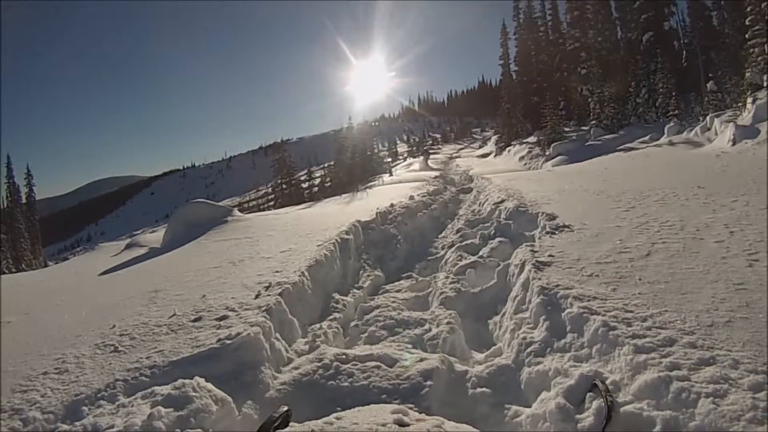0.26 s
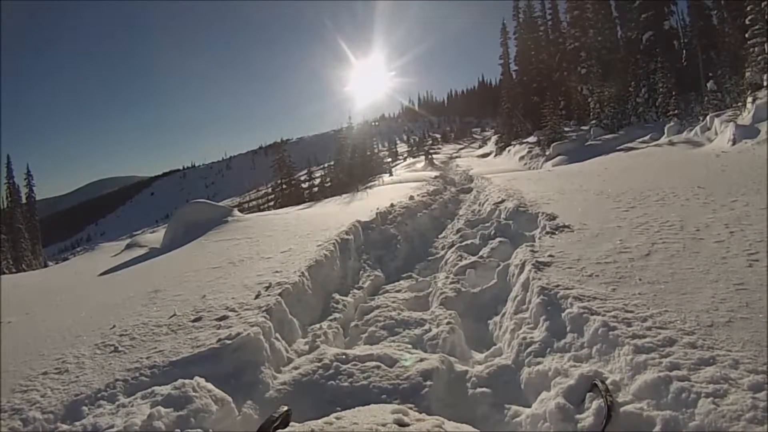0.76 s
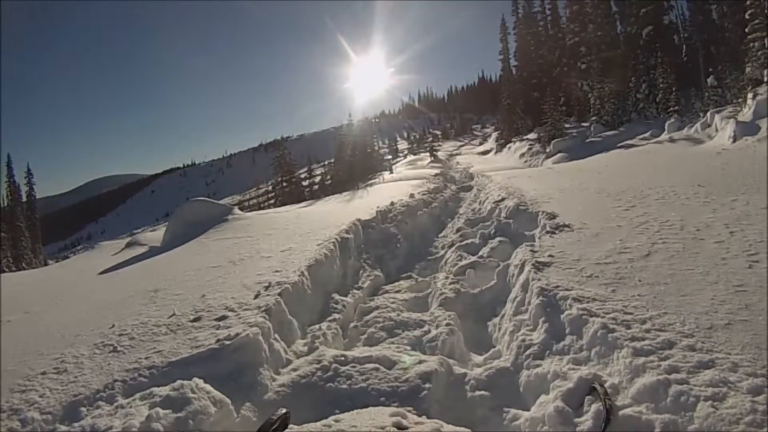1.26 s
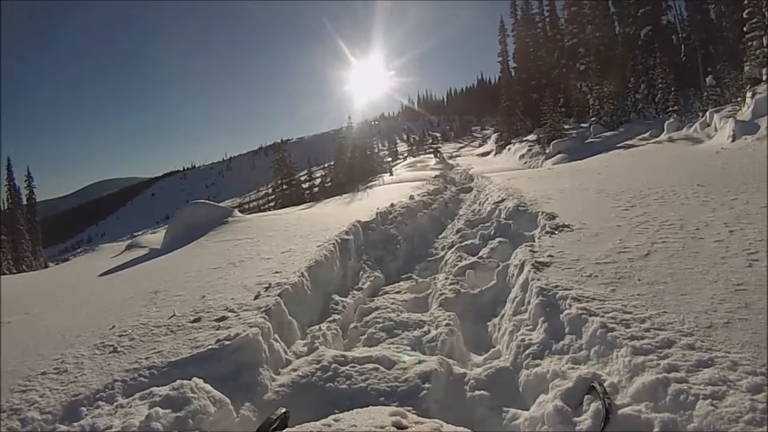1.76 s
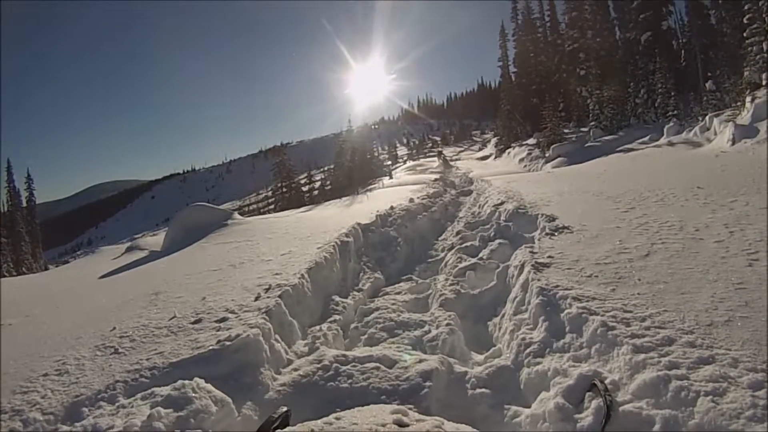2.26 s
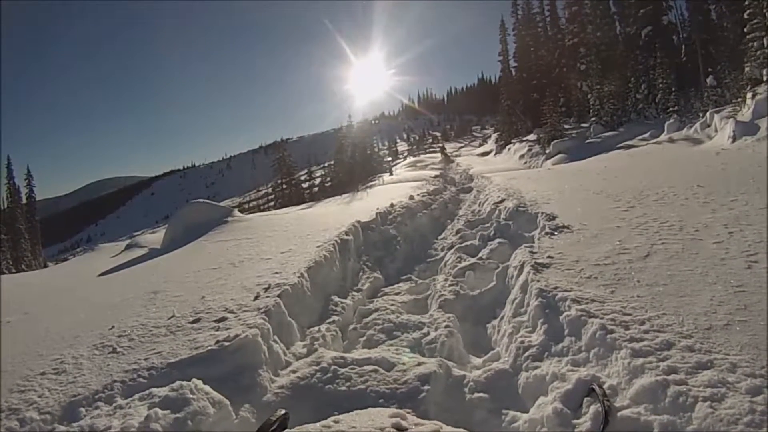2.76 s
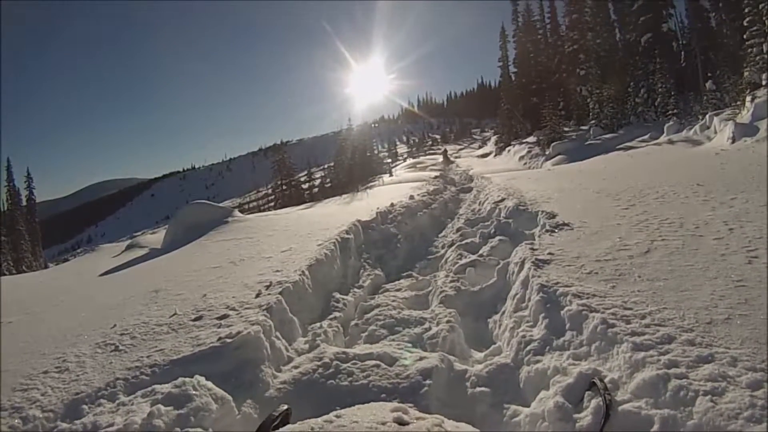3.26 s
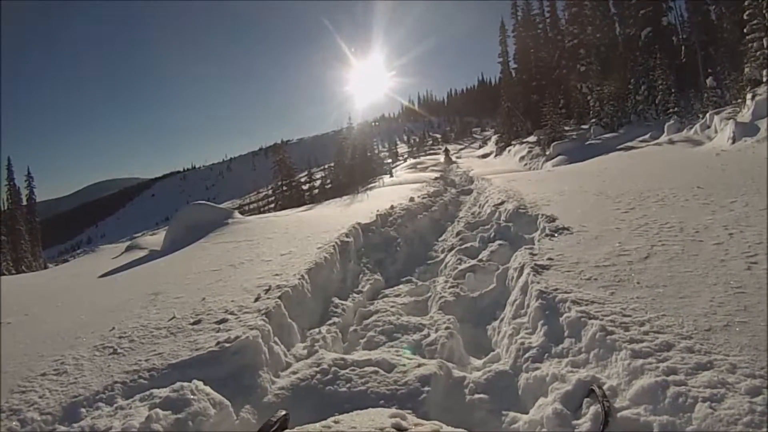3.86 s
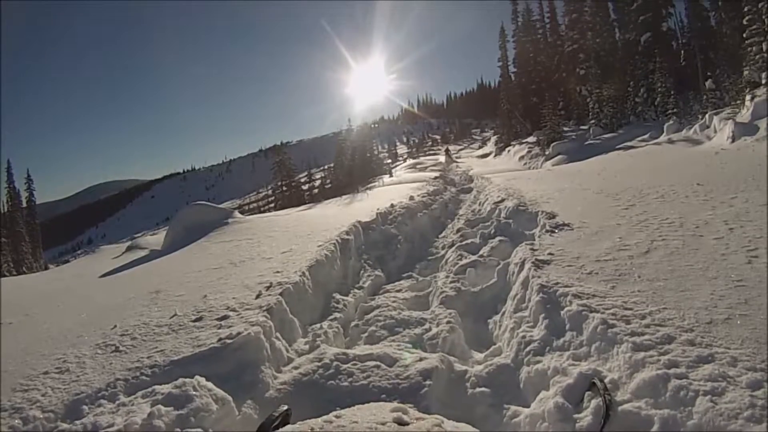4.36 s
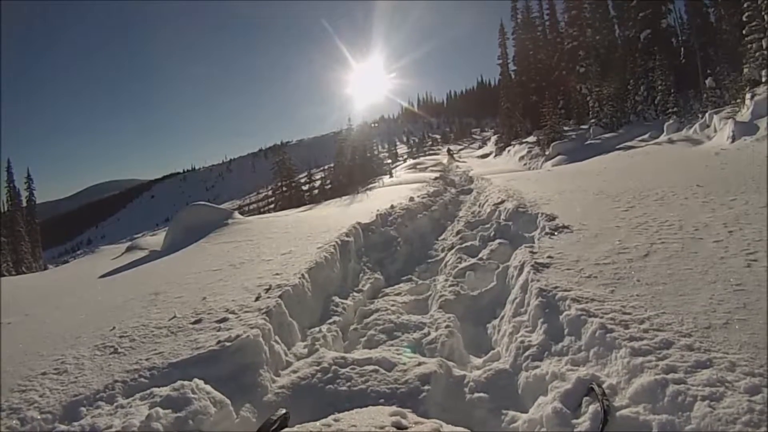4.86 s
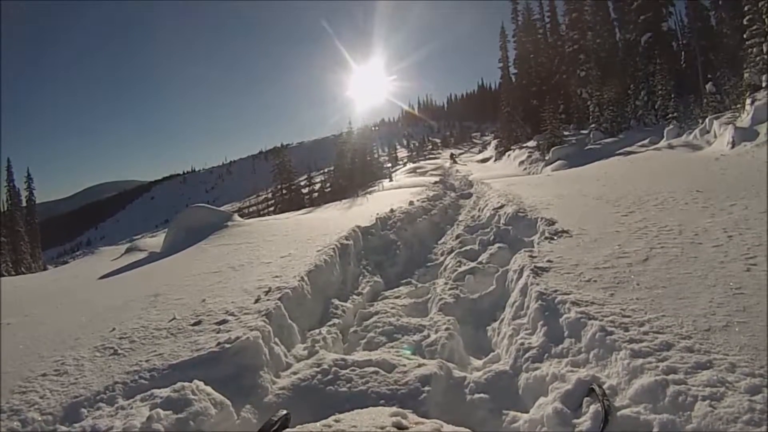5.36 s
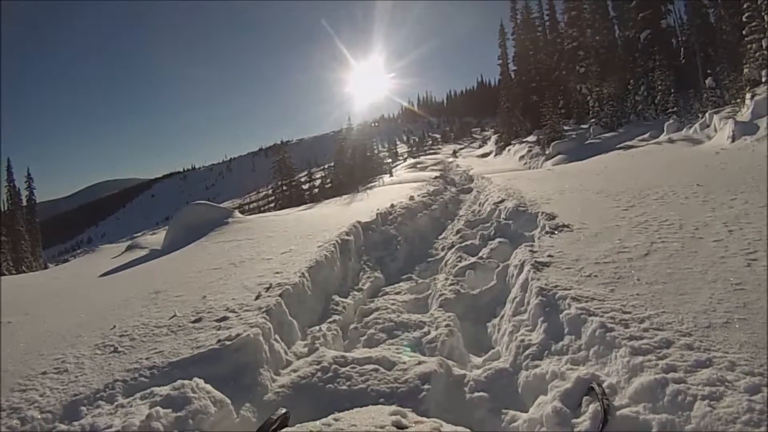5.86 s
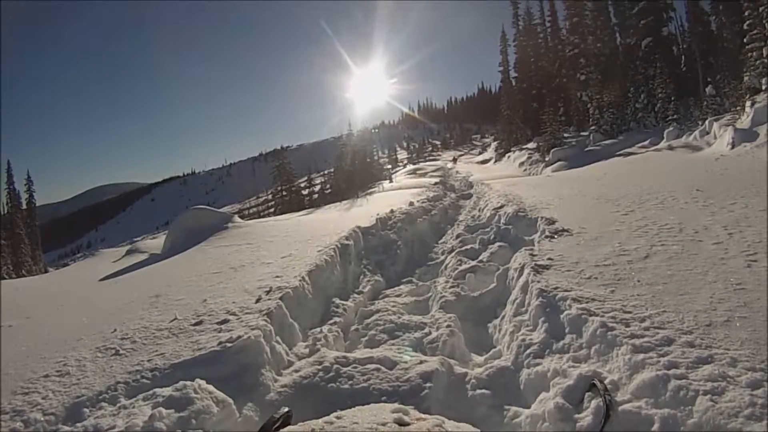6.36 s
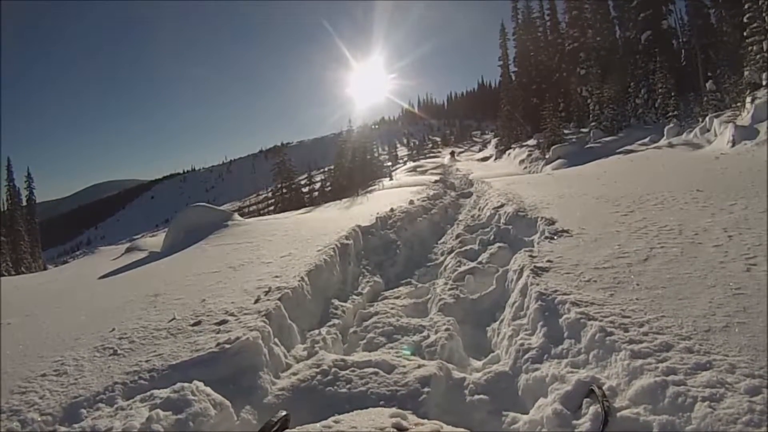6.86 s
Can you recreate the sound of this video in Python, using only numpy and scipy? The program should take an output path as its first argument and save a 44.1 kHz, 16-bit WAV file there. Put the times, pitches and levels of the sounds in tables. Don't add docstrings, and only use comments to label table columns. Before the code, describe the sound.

A snowmobile's two-stroke engine idles throughout, picked up by a sealed camera clamped to its body. A very deep, near-pure throb dominates, sagging briefly at each misfire. Quieter exhaust puffs, intake breath and casing rattle sit above it. Loose fittings snap and thud, mostly in the first second; a harder metallic knock comes from about 1.3 to 2.3 seconds, then the idle carries on. Open snow, no echo, dulled treble.

```python
import sys
import numpy as np
from scipy import signal
from scipy.io import wavfile
from scipy.ndimage import uniform_filter1d

SR = 44100
rng = np.random.default_rng(int(sys.argv[2]) if len(sys.argv) > 2 else 0)


def amplitude_ratio(level_db):
    exponent = np.asarray(level_db, float) / 20
    return 10 ** exponent


def put_to_file(sound):
    columns = np.atleast_2d(sound).T
    safe = np.clip(columns, -1, 1)
    whole_steps = np.round(safe * 32767)
    wavfile.write(sys.argv[1], SR, whole_steps.astype(np.int16))


N = 313110
COARSE = np.arange(0, N, 64)


def unit(x):
    return x / np.sqrt(np.mean(x ** 2))


def curves(table):
    s, *columns = np.transpose(table)
    return [np.interp(np.arange(N) / SR, s, column) for column in columns]


def refine(coarse_values):
    return np.interp(np.arange(N), COARSE, coarse_values)


def ring(x, hz, width_hz):
    return signal.lfilter(*signal.iirpeak(hz, hz / width_hz, fs=SR), x)


def body(x, modes):
    out = np.zeros(N)
    for k, (hz, width_hz, level_db) in enumerate(modes):
        out += (-1) ** k * amplitude_ratio(level_db) * ring(x, hz, width_hz)
    return out


def walk(rate):
    hold = int(SR / rate)
    steps = np.repeat(rng.standard_normal(N // hold + 1), hold)
    return 1.36 * uniform_filter1d(uniform_filter1d(steps, hold), hold)[:N]


def blows(turns, place, scatter, scatter_db):
    chance = np.clip(rng.standard_normal((260, 3)), -2, 2)
    at = np.searchsorted(turns, np.arange(len(chance)) + place + scatter * chance[:, 0])
    force = np.sign(chance[:, 2]) * amplitude_ratio(scatter_db * chance[:, 1])
    out = np.zeros(N + 1)
    np.add.at(out, at, force * (at > 0))
    return out[:N]


def struck(events, delay_s):
    s, peak_db = np.transpose(events)
    out = np.zeros(N)
    out[((s + delay_s) * SR).astype(int)] = amplitude_ratio(peak_db)
    return out


def smear(x, tail_s):
    reach_s = np.arange(-1000, 1001) / SR
    envelope = signal.oaconvolve(np.abs(x), np.exp(-np.abs(reach_s) / tail_s), "same")
    return envelope * rng.standard_normal(N)


# start_s [s], turns_hz [Hz], shake_db [dB]
IDLE_SPEED = [(0.0, 28.45, -8.2), (0.28, 30.7, -5.8), (1.01, 30.48, -6.6), (1.42, 27.88, -11.3),
              (1.82, 30.68, -6.4), (2.09, 29.63, -5.9), (2.34, 30.12, -5.4), (2.87, 29.75, -7.4),
              (3.22, 29.4, -6.5), (3.68, 30.15, -7.1), (4.11, 29.94, -6.2), (4.76, 29.01, -10.3),
              (4.95, 28.59, -7.4), (5.57, 30.29, -4.9), (5.77, 30.05, -6.0), (6.43, 29.66, -7.5),
              (6.59, 30.2, -6.0), (7.1, 29.82, -7.5)]
# start_s [s], sag_db [dB of shake], slow_hz [Hz of crank speed]
SINGLE_MISFIRES = [(0.121, 1.0, 1.48), (0.251, 3.0, 4.34), (0.393, 3.2, 3.86), (0.53, 2.4, 2.64),
                   (1.429, 3.1, 1.47), (1.55, 1.9, 1.29), (1.69, 3.8, 3.46), (1.764, 1.6, 1.51),
                   (1.848, 12.3, 7.86), (1.995, 5.5, 4.94), (2.138, 5.2, 3.74), (2.262, 4.5, 3.59),
                   (2.402, 4.0, 3.08), (2.582, 1.3, 1.43), (3.363, 2.2, 1.28), (3.534, 1.5, 1.82),
                   (3.637, 5.9, 4.11), (3.764, 3.7, 2.89), (3.914, 2.8, 2.3), (4.035, 3.5, 2.3),
                   (4.229, 2.8, 2.0), (4.409, 2.6, 2.22), (4.569, 0.6, 1.65), (4.718, 5.5, 3.09),
                   (5.001, 3.5, 1.62), (5.163, 1.8, 1.41), (5.32, 3.3, 3.45), (5.47, 5.3, 3.8),
                   (5.604, 4.1, 2.73), (7.0, 2.5, 2.49)]
# first_s [s], spacing_s [s], count, sag_db [dB], slow_hz [Hz]
MISFIRE_RUNS = [
    (0.691, 0.177, 4, 1.6, 0.72),
    (2.784, 0.144, 3, 2.5, 1.78),
    (5.73, 0.135, 5, 2.5, 1.51),
    (6.393, 0.153, 4, 2.6, 2.32),
]


def crank():
    hz, shake_db = curves(IDLE_SPEED)
    misfires = list(SINGLE_MISFIRES)
    for first_s, spacing_s, count, *size in MISFIRE_RUNS:
        misfires += [(first_s + k * spacing_s, *size) for k in range(count)]
    s, sag_db, slow_hz = np.transpose(misfires)
    since_s = COARSE[:, None] / SR - s
    sag_s, recover_s, slow_s = .03, .024, .02
    sag_db = np.exp(-.5 * (since_s / np.where(since_s < 0, sag_s, recover_s)) ** 2) @ sag_db
    slow_hz = np.exp(-.5 * (since_s / slow_s) ** 2) @ slow_hz
    start_turn = .388
    turns = start_turn + np.cumsum(hz - refine(slow_hz)) / SR
    trend = np.linspace(turns[0], turns[-1], N)
    flywheel = trend + uniform_filter1d(turns - trend, size=SR // 4, mode="nearest")
    return turns, shake_db - refine(sag_db), flywheel


# start_s [s], strain_db [dB about the mean]
MOUNT_STRAIN = [(0, 2.5), (.5, -1.5), (1.0, -2), (1.2, -1), (1.42, 2), (2.2, 6), (2.38, 1), (2.65, -0.5),
                (2.9, -1), (3.3, -1.5), (3.8, 0), (4.0, 0.5), (4.25, -2), (4.7, 1), (5.3, 5), (5.65, -0.5),
                (6.1, -1), (7.1, -0.5)]


def controls(shake_db):
    mean_swing_db, swing_s, middle_s = -8, .25, 3.5
    swing_db = uniform_filter1d(shake_db, size=int(swing_s * SR)) - mean_swing_db
    return np.array([np.ones(N), *curves(MOUNT_STRAIN), swing_db, np.arange(N) / SR - middle_s])


# multiple, from_s [s], to_s [s], lift_db [dB]; a negative lift or from_s
# after to_s makes a dip, both together a swell
ORDER_SPELLS = [(2, -2, 0.8, 3), (2, 0.4, 2.16, 4.5), (2, 1.5, 3.1, 2.5), (2, 3.5, 4.7, 5.5),
                (2, 3.5, 6.3, -6), (3, .5, 0.89, 10.5), (3, 1.6, 2.7, 5), (3, 3.5, 3.1, 6),
                (3, 3, 4.1, 4.5), (3, 5, 4.95, 6), (3, 5, 7.2, 12), (4, -0.3, 1.1, 3.5), (4, 1.6, 1.59, 3),
                (4, 2.36, 2.3, 9), (4, 2.3, 2.68, 4.5), (4, 2.5, 3.48, 11), (4, 4, 5.5, 5.5),
                (5, 1, 1.36, 8.5), (5, 2, 3.6, -0.5), (5, 4.5, 4.1, 5.5), (6, 0.1, 1.3, -4),
                (6, 0.8, 1.9, 3), (6, 3.5, 3.34, -5), (6, 5.5, 7.2, 4), (7, -0.4, 1.1, 5), (7, 1.1, 1.7, 1),
                (8, 0.2, .3, 8.5), (8, -1.5, .7, 4), (8, 1.1, 1.13, 11.5), (8, 1.75, 1.9, 12.5),
                (8, 1.8, 2.34, 9), (8, 3, 2.8, 4), (8, 3.05, 3.41, 10.5), (8, 3.5, 3.88, 15.5),
                (8, 4, 4.3, 10.5), (8, 5, 5.5, 11.5), (8, 6, 6.8, 5), (9, 5, 5.7, 10.5), (9, 6, 7.9, 5),
                (10, 0.2, 1.9, 9), (10, 2, 2.3, 14.5), (10, 3.7, 4.0, 5.5), (10, 4, 4.7, 9),
                (10, 6, 6.2, 4), (11, 0.8, 1.9, 12.5), (11, 2.1, 2.35, 13), (11, 4.5, 5.1, 13)]


def spell_db(multiple):
    t, edge_s = np.arange(N) / SR, 0.032
    lift = np.zeros(N)
    for k, from_s, to_s, lift_db in ORDER_SPELLS:
        if round(k) == multiple:
            lift += lift_db * (np.tanh((t - from_s) / edge_s) - np.tanh((t - to_s) / edge_s)) / 2
    return lift


# level_db [dB], per_strain [dB/dB], per_swing [dB/dB], settling [dB/s]
SECOND_ORDER = (-34, 1.12, 0.05, 0.56)
# lean [rad], per_strain [rad/dB], per_swing [rad/dB], settling [rad/s]
CREST_LEAN = (0.23, -0.13, 0.39, 0.088)
# multiple, level_db [dB], per_strain [dB/dB], per_swing [dB/dB], settling [dB/s]
STRONG_ORDERS = [(3, -46.5, 0.01, 0.34, -0.56), (4, -51.5, 0.05, .1, -2), (8, -50.5, 0.41, .01, -0.7)]
# multiple, level_db [dB]
WEAK_ORDERS = [(5, -49.5), (6, -49.5), (7, -49.5), (9, -56), (10, -57), (11, -58)]


def shake(turns, shake_db, flywheel, state):
    def order(multiple, level_db, phase):
        return amplitude_ratio(level_db) * np.cos(2 * np.pi * multiple * flywheel + phase)

    out = amplitude_ratio(shake_db) * np.cos(2 * np.pi * turns)
    out += order(2, SECOND_ORDER @ state + spell_db(2) + 1.8 * walk(25), CREST_LEAN @ state)
    for k, *law in STRONG_ORDERS:
        wander_db = spell_db(k) + .5 * walk(3) + 1.2 * walk(20)
        out += order(k, law @ state + wander_db, np.pi + .35 * walk(5))
    for k, level_db in WEAK_ORDERS:
        wander_db = spell_db(k) + .5 * walk(3) + 2.6 * walk(20)
        out += order(k, level_db + wander_db, np.pi + .9 * walk(9))
    return np.sqrt(2) * out


# centre_hz [Hz], width_hz [Hz], level_db [dB]
SILENCER_MODES = [(110, 56, 0.5), (162.2, 59.4, -5.5), (191.6, 32, -10), (232, 54.4, -3.5),
                  (289.4, 73.6, -1.5), (389.3, 56.8, -6)]
# level_db [dB], per_strain [dB/dB], per_swing [dB/dB], settling [dB/s]
EXHAUST_LEVEL = (-35.5, 0.65, -0.2, 0)


def exhaust(flywheel, state):
    strong = np.abs(blows(flywheel, .9, .035, 3.5))
    weak = amplitude_ratio(-13.0) * np.abs(blows(flywheel, .4, 0.012, 3.1))
    turbulence = rng.standard_normal(N) * amplitude_ratio(0.72 * walk(12))
    drive = unit(strong + weak) * amplitude_ratio(-5.5) + turbulence
    return unit(body(drive, SILENCER_MODES)) * amplitude_ratio(EXHAUST_LEVEL @ state - 0.5)


# start_s [s], cover_db [dB of cover ring], crack_db [dB of crack]
PISTON_SLAPS = [(1.2596, -51, -41), (1.2947, -48, -44), (1.3323, -43, -39), (1.3673, -38, -38),
                (1.4021, -35, -34), (1.4378, -47, -35), (1.4741, -37, -33), (1.5091, -36, -36),
                (1.5453, -40, -31), (1.5814, -40, -34), (1.6164, -38, -34), (1.6522, -39, -33.5),
                (1.6886, -39, -35), (1.725, -34, -35), (1.7601, -34, -33), (1.7972, -35, -34),
                (1.8327, -36, -33.5), (1.8687, -36, -33.5), (1.9037, -35, -34), (1.94, -40, -37),
                (1.9752, -41, -34), (2.0106, -45.5, -32.5), (2.0446, -38, -43), (2.0806, -41, -39),
                (2.1158, -44, -29.5), (2.1522, -39, -33), (2.187, -40, -37), (2.2224, -40, -33.5),
                (2.2573, -43, -38), (2.2929, -44, -41), (2.326, -56, -44), (2.3636, -54, -46),
                (3.6279, -47, -40), (3.6629, -51, -40), (3.6977, -56, -41), (3.7299, -49, -41),
                (3.7664, -46, -43), (3.8008, -45, -39), (3.8337, -44, -41), (3.8673, -41, -41),
                (3.9024, -38, -37), (3.9371, -47, -37), (3.9727, -48, -45), (4.0081, -46, -45),
                (4.0435, -51, -43), (4.9475, -47, -39), (4.9829, -55, -44), (5.0533, -46, -43),
                (5.0882, -41, -48), (5.1586, -42, -41), (5.1934, -42, -42), (5.2281, -47, -41),
                (5.26, -47, -45), (5.2988, -45, -45), (5.3326, -48, -41), (5.3675, -50, -41),
                (5.4019, -45, -48), (5.437, -44, -42)]
# centre_hz [Hz], width_hz [Hz], level_db [dB]
CASING_MODES = [(1093, 78, -12), (1336, 84, -7), (1408.5, 34.6, 2.5), (1509, 73, -2), (1589, 102, -3),
                (1688, 132, -4.5), (2049, 155, -12), (2436, 180, -19)]
# level_db [dB], per_strain [dB/dB], per_swing [dB/dB], settling [dB/s]
KNOCK_LEVEL = (-57.3, 1.45, -.5, -.65)


def knock(state):
    level_db = KNOCK_LEVEL @ state
    slack_db, slack_span_db = -51.8, 1.1
    slack = 1 / (1.5 + np.exp((slack_db - level_db) / slack_span_db))
    churn = (1 - .92 * slack) * unit(ring(ring(rng.standard_normal(N), 820, 140), 820, 140))
    s, cover_db, crack_db = np.transpose(PISTON_SLAPS)
    cover_blow = struck(np.c_[s, cover_db], 0.00252)
    cover = amplitude_ratio(44.5) * ring(ring(cover_blow, 823, 96), 823, 96)
    slap = struck(np.c_[s, crack_db], 0.00117)
    slap = slap + .025 * smear(slap, .001)
    crack = amplitude_ratio(26) * ring(ring(ring(slap, 2050, 1200), 2050, 1200), 2050, 1200)
    bore = amplitude_ratio(33) * ring(ring(slap, 1970, 260), 1970, 260)
    casing = amplitude_ratio(24) * body(slap, CASING_MODES)
    return amplitude_ratio(level_db - 1.0) * churn + cover + crack + bore + casing


# level_db [dB], per_strain [dB/dB], per_swing [dB/dB], settling [dB/s]
RATTLE_LEVEL = (-43, 0.49, -0.05, -0.1)


def rattle(flywheel, state):
    bursts = sum(smear(blows(flywheel, place, 0.025, 2.8), .0015) for place in (.28, .66, .72))
    churn = rng.standard_normal(N) * amplitude_ratio(0.72 * walk(17))
    drive = amplitude_ratio(-3.0) * unit(bursts) + churn
    return unit(body(drive, CASING_MODES)) * amplitude_ratio(RATTLE_LEVEL @ state)


# centre_hz [Hz], width_hz [Hz], level_db [dB]
AIR_BOX_MODES = [(465, 98, -1.5), (559.5, 147, -3), (642, 93, -5.5)]
# level_db [dB], per_strain [dB/dB], per_swing [dB/dB], settling [dB/s]
INTAKE_LEVEL = (-47.5, 1.5, -0.5, 0.1)


def intake(flywheel, state):
    gulp = 1 + 0.53 * np.cos(2 * np.pi * (flywheel - .95))
    air = gulp * rng.standard_normal(N) * amplitude_ratio(0.52 * walk(15))
    return unit(body(air, AIR_BOX_MODES)) * amplitude_ratio(INTAKE_LEVEL @ state - 1.5)


# place [turns], scatter [turns], level_db [dB], scatter_db [dB]
SLACK_STRIKES = [(.79, .035, 0, 3), (.72, .04, -3, 3), (.27, .012, -2, 3), (.68, .05, -7, 3.5),
                 (.84, .04, -6, 3.5), (.36, .08, -8, 4), (.5, .15, -9, 4), (.6, .2, -10, 4)]


def slack_strikes(turns, shake_db):
    swing = amplitude_ratio(0.53 * (shake_db - uniform_filter1d(shake_db, size=SR // 4)))
    strikes = np.zeros(N)
    for place, scatter, level_db, scatter_db in SLACK_STRIKES:
        strikes += amplitude_ratio(level_db) * np.abs(blows(turns, place, scatter, scatter_db))
    return unit(smear(strikes * swing * amplitude_ratio(1.6 * walk(14) + 1.2 * walk(5)), .0004))


# middle_s [s], half_s [s], lift_db [dB]
CHATTER_SPELLS = [(0.327, 0.018, 1), (.48, 0.027, 1), (.62, .04, 6), (.78, .04, 4.5), (.84, .015, 2),
                  (.93, 0.045, 3.5), (1.115, .02, 5), (1.92, .02, 5.5), (2.475, 0.013, 5), (3.26, .03, 5),
                  (3.44, .02, 7), (3.673, 0.024, 0.5), (4.473, 0.035, -0.5), (4.694, .03, 5),
                  (4.76, 0.013, 4), (5.1, .02, 4.5), (5.38, .03, 1.5), (5.718, 0.027, 1.5),
                  (5.98, .025, -0.5), (6.249, 0.026, 1), (6.607, 0.018, 3), (6.88, 0.015, 2.5)]


def chatter_lift():
    middle_s, half_s, lift_db = np.transpose(CHATTER_SPELLS)
    return refine(np.exp(-((COARSE[:, None] / SR - middle_s) / half_s) ** 2) @ lift_db)


# centre_hz [Hz], width_hz [Hz], level_db [dB]
CLUTCH_MODES = [(5860, 1500, -4.5), (7740, 580, 1), (9700, 1800, -10.5), (10970, 530, -2.5),
                (12000, 1200, -1.5), (14600, 2400, -10)]
# start_s [s], peak_db [dB]
HARD_TICKS = [(0.03, -40), (0.222, -43), (0.3252, -38), (0.4569, -51), (0.4953, -44), (0.7302, -39),
              (0.7477, -34), (0.7791, -36), (0.8113, -39), (1.024, -44), (1.1253, -41), (1.1593, -41),
              (1.1934, -40), (1.4808, -38), (1.9395, -37), (2.0043, -41), (2.048, -45), (2.1166, -41),
              (2.148, -44), (2.2243, -36), (2.2842, -41), (2.3271, -45), (2.394, -46), (2.421, -49),
              (2.4329, -41), (2.4518, -47), (2.464, -35.5), (2.5331, -46), (2.6556, -40), (2.7672, -36.5),
              (2.8055, -42), (2.9058, -46), (2.9417, -45), (3.249, -41), (3.3503, -45), (3.5918, -42),
              (3.8252, -44), (3.8382, -42), (3.8705, -36), (3.922, -50), (4.009, -50), (4.0407, -47),
              (4.0602, -47), (4.1432, -41.5), (5.0409, -42), (5.0534, -40), (5.0836, -45), (5.2919, -39),
              (5.3973, -37), (5.4321, -42), (5.4889, -48), (5.508, -44), (5.5553, -49), (5.5722, -38.5),
              (5.662, -34.5), (5.7668, -35.5), (5.8777, -38), (6.0676, -49), (6.7374, -46), (6.7865, -49)]
# level_db [dB], per_strain [dB/dB], per_swing [dB/dB], settling [dB/s]
TICKS_LEVEL = (-60.5, 0.12, 0.9, 0.03)


def clutch(bursts, clatter_db, state):
    flutter_db = 6.5 * np.clip(walk(150), -2.2, 1.5) + 2.5 * walk(12)
    hiss = ring(ring(rng.standard_normal(N), 7000, 8000), 7000, 8000) * amplitude_ratio(flutter_db)
    hiss_top_hz = 12900
    hiss = signal.sosfilt(signal.cheby2(8, 14, hiss_top_hz * 1.05, fs=SR, output="sos"), hiss)
    level_db = TICKS_LEVEL @ state + 0.61 * clatter_db
    small = unit(body(bursts + 0.58 * hiss, CLUTCH_MODES)) * amplitude_ratio(level_db - 0.47)
    hard = amplitude_ratio(7.0) * body(smear(struck(HARD_TICKS, 0.00092), 0.00042), CLUTCH_MODES)
    return small + hard


# centre_hz [Hz], width_hz [Hz], level_db [dB]
FITTING_MODES = [(2770, 580, -5), (3347, 376, -1.5), (4760, 400, -7)]
# start_s [s], peak_db [dB]
FITTING_SNAPS = [(0.0358, -50), (0.0752, -46), (0.119, -41), (0.2543, -39), (0.3321, -38), (0.592, -43),
                 (0.6439, -36), (0.749, -34.5), (0.7791, -39), (0.8003, -44), (0.8111, -38.5),
                 (0.8385, -49), (0.9009, -39), (0.9328, -37), (0.9677, -35), (1.1019, -35), (1.1573, -47),
                 (1.1922, -42), (1.263, -40), (1.288, -38), (1.3713, -48), (1.4685, -48), (1.5733, -48),
                 (1.6472, -44), (1.7604, -45), (1.8572, -33.5), (1.9036, -40), (1.9749, -52), (2.0423, -51),
                 (2.1151, -48), (2.141, -45), (2.327, -46), (2.4314, -43), (2.4638, -44), (2.7024, -41),
                 (3.0096, -46), (3.0804, -48), (3.1822, -45), (3.2166, -44.5), (3.2495, -35),
                 (3.3967, -33.5), (3.4875, -41), (3.6516, -45), (3.7234, -46), (3.8347, -44.5),
                 (4.142, -48), (4.6513, -45), (4.6853, -41), (4.757, -41.5), (4.9182, -41), (4.968, -33),
                 (5.2844, -41.5), (5.4031, -41), (5.5049, -37), (5.7867, -55), (5.7867, -31), (5.8775, -44),
                 (6.0816, -45), (6.6089, -51), (6.6089, -34.5)]
# start_s [s], peak_db [dB]
HOUSING_THUDS = [(0.332, -41), (0.604, -39), (0.636, -37), (0.747, -41), (0.779, -44), (0.8, -32),
                 (0.9, -36), (0.932, -39), (0.967, -32.5), (1.093, -36), (1.106, -34), (1.139, -40),
                 (3.225, -32), (3.249, -43), (3.262, -40), (3.276, -35), (3.309, -37), (3.397, -38),
                 (3.428, -40), (3.446, -42), (4.756, -41), (4.967, -46), (5.403, -42), (5.786, -37),
                 (6.608, -34)]
# level_db [dB], per_strain [dB/dB], per_swing [dB/dB], settling [dB/s]
FITTINGS_LEVEL = (-58.5, 0.38, 0.5, -0.2)


def fittings(bursts, clatter_db, state):
    level_db = FITTINGS_LEVEL @ state + clatter_db
    drive = 0.62 * bursts + rng.standard_normal(N) * amplitude_ratio(2.0 * walk(40))
    jingle = unit(body(drive, FITTING_MODES)) * amplitude_ratio(level_db - 0.5)
    snaps = struck(FITTING_SNAPS, .0008)
    snaps = snaps + .06 * smear(snaps, .001)
    snap = amplitude_ratio(13) * ring(ring(snaps, 4300, 3500), 4300, 3500)
    snap_edge = amplitude_ratio(5) * ring(struck(FITTING_SNAPS, 0.00089), 10000, 9000)
    thud = amplitude_ratio(32.0) * ring(ring(struck(HOUSING_THUDS, 0.001), 750, 600), 750, 600)
    return jingle + snap + snap_edge + thud


def rumble():
    return amplitude_ratio(-31) * unit(ring(ring(rng.standard_normal(N), 46, 25), 38, 50))


def scene():
    turns, shake_db, flywheel = crank()
    state = controls(shake_db)
    engine = exhaust(flywheel, state) + knock(state) + rattle(flywheel, state) + intake(flywheel, state)
    bursts = slack_strikes(turns, shake_db)
    clatter_db = chatter_lift()
    loose = clutch(bursts, clatter_db, state) + fittings(bursts, clatter_db, state)
    return (shake(turns, shake_db, flywheel, state) + engine + loose + rumble())[None]


# middle_s [s], half_s [s], bands that still pass [Hz]
TREBLE_DROPOUTS = [
    (3.154, .009, (3000, 3800, 7600, 12100)),
    (3.707, .007, (3300, 5100, 6600, 7700, 8500)),
    (5.029, .0075, (4600,)),
]


def starve(x):
    treble = signal.sosfiltfilt(signal.butter(6, 2800, "high", fs=SR, output="sos"), x)
    out = x
    for middle_s, half_s, bands in TREBLE_DROPOUTS:
        gate = np.exp(-((np.arange(N) / SR - middle_s) / half_s) ** 4)
        passed = sum(amplitude_ratio(9) * ring(ring(treble, hz, 150), hz, 150) for hz in bands)
        out = out + .98 * gate * (passed - treble)
    return out


def roll_off(x):
    return signal.sosfilt(signal.butter(12, 15830, fs=SR, output="sos"), x)


def record(dry):
    housing_hz = 12600
    dulled = signal.sosfiltfilt(signal.butter(2, housing_hz, fs=SR, output="sos"), dry)
    return roll_off(starve(dulled))


dry = scene()
out = record(dry)
put_to_file(out)
```